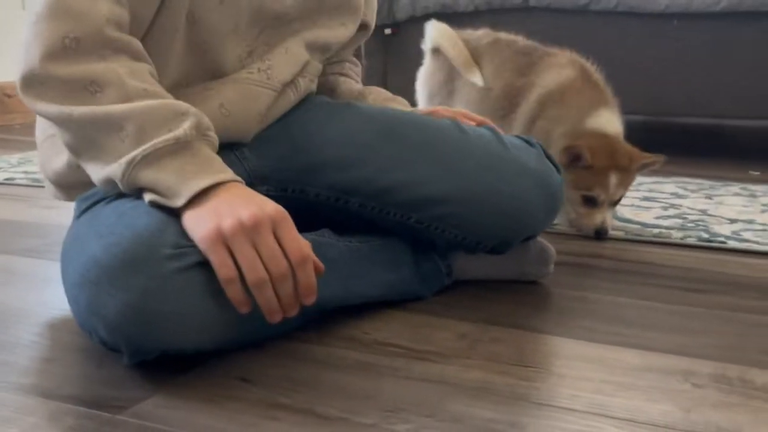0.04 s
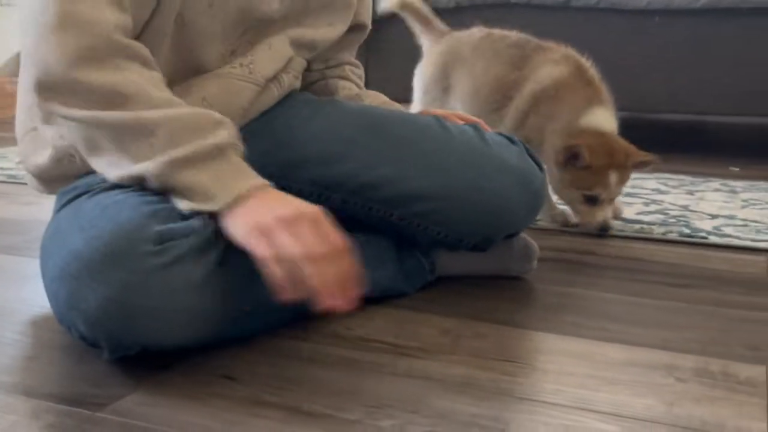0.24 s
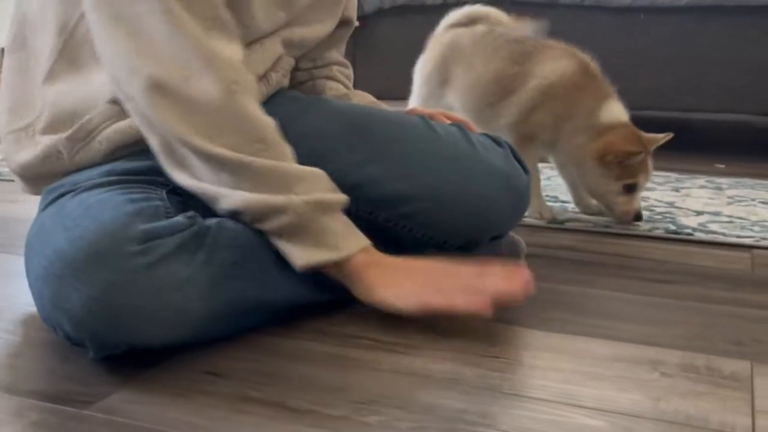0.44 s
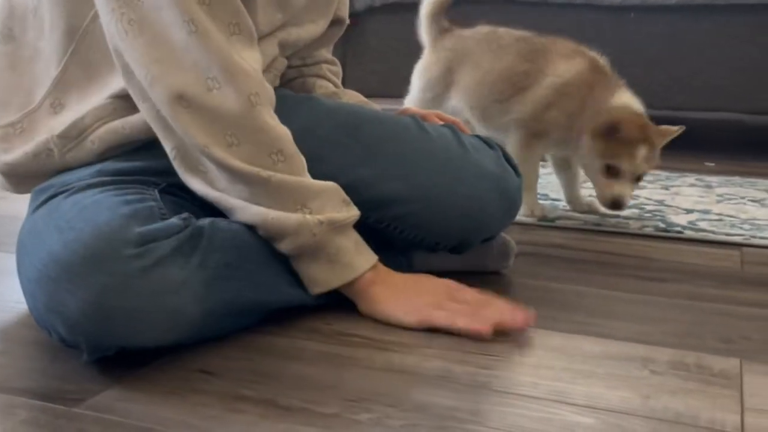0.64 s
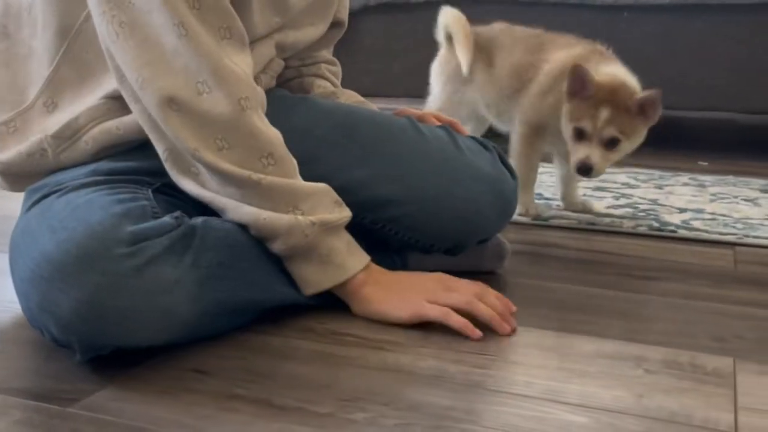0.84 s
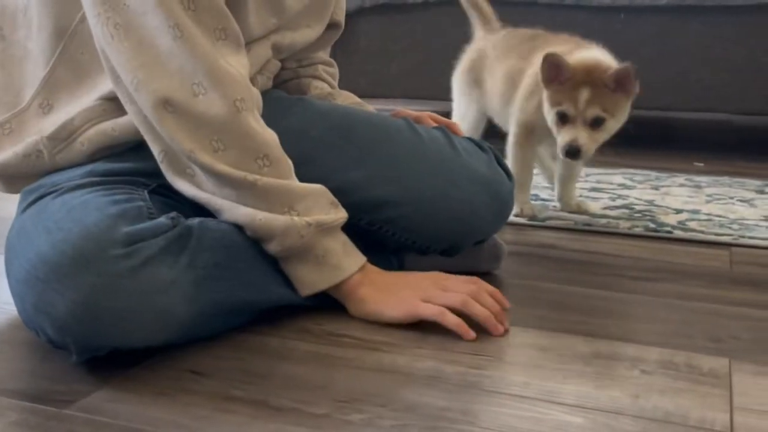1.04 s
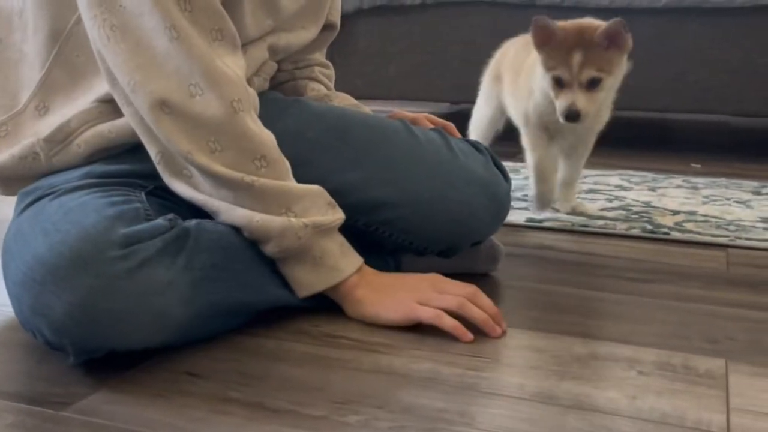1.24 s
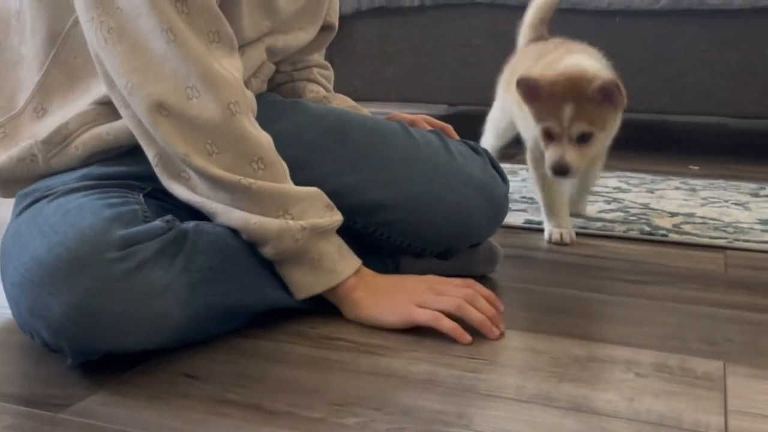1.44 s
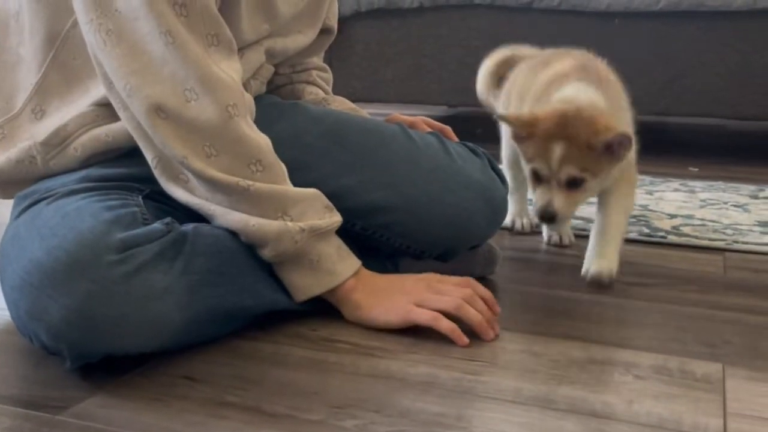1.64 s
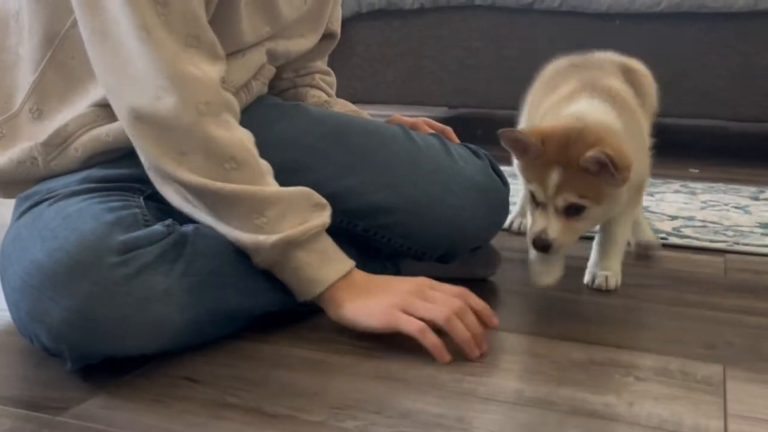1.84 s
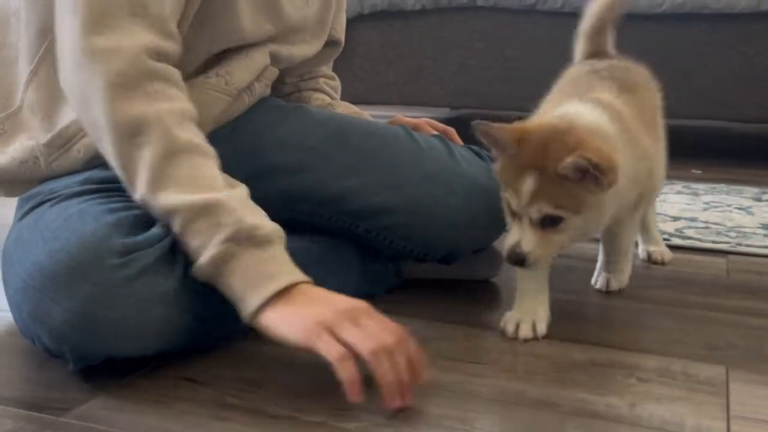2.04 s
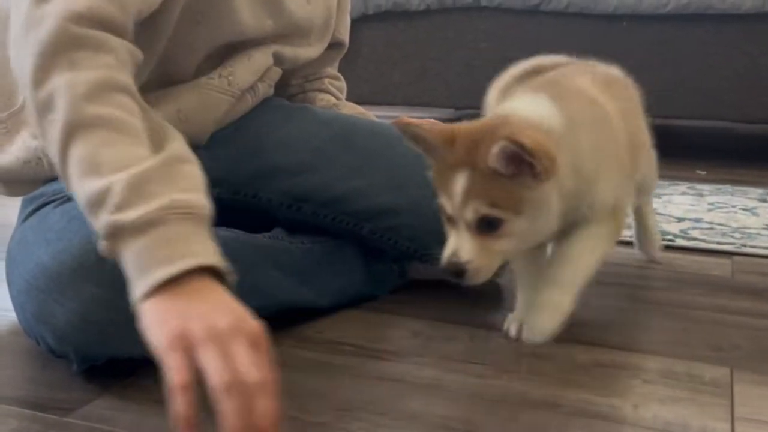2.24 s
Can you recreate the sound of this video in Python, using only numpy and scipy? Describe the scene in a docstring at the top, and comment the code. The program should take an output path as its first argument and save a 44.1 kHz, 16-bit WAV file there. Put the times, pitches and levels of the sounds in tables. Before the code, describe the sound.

A small dog's footsteps cross a hard floor indoors, close to the microphone. First a hand smacks the boards and the fingertips tap down; then padded steps approach with light claw clicks, over faint sleeve rustle and a low appliance hum.

```python
"""Puppy crossing a laminate floor

A small room, a stereo microphone near someone who sits on the floor and pats it with one hand.
A puppy walks off a rug towards them; its claws tick and skid as it comes close.
Every pat and paw sends a bending wave through the hollow floor and sets the boards ringing.
A sleeve rustles as the arm moves, and an appliance hums in the background."""
import sys
import numpy as np
from scipy import signal
from scipy.fft import rfft, irfft, next_fast_len
from scipy.io import wavfile
from scipy.ndimage import map_coordinates

SR = 44100
rng = np.random.default_rng(int(sys.argv[2]) if len(sys.argv) > 2 else 0)


def wav_out(sig):
    """Save sig, one row per channel (or a flat mono array), as 16-bit PCM at SR to the path in sys.argv[1]."""
    wavfile.write(sys.argv[1], SR, np.round(np.clip(np.atleast_2d(sig).T, -1, 1) * 32767).astype(np.int16))


N = 100768
T = np.arange(N) / SR
FFT_SIZE = next_fast_len(N + SR)
HZ = np.fft.rfftfreq(FFT_SIZE, 1 / SR)

# Each row: start in seconds, thud in dB, softness corner in Hz, tick in dB, nail ping in Hz.
PAW_FALLS = [(.052, -58.5, 390, -80, 4000), (.786, -50.5, 167, -82, 4000),
             (0.8664, -38, 101.4, -59.5, 4300), (.9485, -40, 119.6, -58, 3600),
             (1.071, -31.5, 109.2, -58, 4270), (1.1454, -42.5, 120.5, -63, 3510),
             (1.412, -55, 390, -63, 5700), (1.5226, -39, 163, -53.5, 3670), (1.607, -69, 305, -72.5, 4200),
             (1.625, -33.5, 204, -60, 4170), (1.7404, -36.5, 166, -56.5, 4350),
             (1.853, -45.5, 157, -66, 3940), (1.904, -39.5, 110, -75, 4000), (1.95, -37.5, 176, -62, 4000),
             (2.013, -42.5, 238, -56, 4000), (2.028, -38.5, 206, -70.5, 4000),
             (2.119, -39, 148, -50.5, 4000), (2.190, -39, 167, -60, 4050), (2.205, -42.5, 167, -61.5, 4050)]
# Pads dragging. Each row: time in seconds, level in dB.
DRAG_LEVEL = [(1.4, -92), (1.6, -55), (1.68, -57), (1.82, -83), (1.91, -52), (2.07, -53.5), (2.15, -64),
              (2.284, -62.5)]
# Each row: start in seconds, level in dB, decay (t60) in seconds, low cut in Hz.
CLAW_STRIKES = [(1.763, -49.5, .03, 5840), (1.771, -41.5, 0.046, 5200), (1.929, -50, 0.028, 6150),
                (2.0143, -36.5, 0.01, 2500), (2.035, -54, 0.02, 3000), (2.136, -44.5, 0.018, 4400),
                (2.2577, -40, 0.024, 7000), (2.270, -47, 0.034, 7100), (2.275, -51, .035, 7000)]
# Each row: centre in seconds, level in dB, half-length in seconds, pitch in Hz, bandwidth in Hz.
RUBS = [(0.321, -49.5, 0.0082, 497, 50.5), (0.669, -53.5, 0.0057, 500, 120),
        (0.905, -63.5, 0.0016, 1530, 606), (1.424, -47, 0.0059, 248, 88.5),
        (1.949, -62.5, 0.0074, 1400, 1010), (2.014, -51.5, 0.0028, 646, 158),
        (2.042, -56, 0.0037, 630, 150), (2.075, -53, 0.0046, 5600, 160)]
# The hand lands. Each row: time in seconds, thud in dB, softness corner in Hz, skin smack in dB.
PALM_HITS = [(0.5211, -26, 514, -34.5), (0.532, -46, 586, -48.5)]
FINGER_HITS = [(0.697, -63.5, 200, -56.5), (0.702, -29.5, 194.4, -43.5)]
# Each row: pitch in Hz, gain in dB under paws or fingers, gain in dB under the palm, t60 in seconds.
FLOOR_MODES = [(45, -28, -13, 0.44), (68.9, -0.5, -5.5, 0.32), (75, -8, -2, 0.32), (88, -20.5, -12.5, 0.81),
               (161.8, 2.5, -7, 0.2), (195, -6.5, -1.5, 0.22), (220.7, -15.5, -8, 0.42),
               (245.9, -7.5, -1.5, 0.4), (279, -14, -35, 0.35), (334, -18, -10, 0.2), (352.4, -12, -4, 0.2),
               (453, -15, -17, 0.17), (552, -18.5, -9, 0.27), (589, -9, -6, 0.22), (647.6, -9, -17, 0.25),
               (984, -12, -9, 0.2), (1117, -19, -12, 0.1), (1219, -9, -9, 0.16)]
# Cloth and skin sliding. Each row: time in seconds, level in dB.
SLEEVE_LEVEL = [(0, -64.5), (.08, -64), (0.189, -74.5), (.22, -60.5), (.28, -55.5), (.36, -61.5),
                (.49, -63.5), (.54, -56.5), (.6, -68), (.67, -103), (.72, -66.5), (.76, -75), (.81, -98),
                (1.4, -87.5), (1.68, -80.5), (1.79, -66.5), (1.87, -70.5), (1.94, -62), (1.99, -62),
                (2.06, -57), (2.13, -59), (2.2, -59), (2.25, -64.5), (2.284, -55.5)]
# Each row: frequency in Hz, level in dB.
HUM_PARTIALS = [(59.6, -58.5), (119, -60.5)]

# The tone colour of each sound. Each row: frequency in Hz, relative gain in dB.
TICK_COLOUR = [(300, -3), (620, 15), (900, 1), (1400, -1), (2800, -4), (4000, -5), (5200, -10.5),
               (6200, -2), (8500, -1.5), (12000, -4.5)]
DRAG_COLOUR = [(80, -9), (200, 3.5), (290, 6), (400, -19), (640, -16.5), (1000, -26.5), (2000, -36),
               (5000, -60)]
CLAW_COLOUR = [(800, 0), (3000, -2.5), (5000, -8.5), (6200, 5), (7300, -1), (8400, 8), (9800, -2),
               (11300, -1.5), (13000, -1)]
SKID_COLOUR = [(500, -25), (1020, 9.5), (1500, -15), (2400, -2), (2900, -11), (3400, 7), (4000, -8),
               (6500, 2.5), (8600, 3), (12000, -6.5)]
SMACK_COLOUR = [(200, -29), (900, 14), (1400, 5.5), (2200, -2), (4500, -5.5), (8000, -2.5), (12000, -4)]
RATTLE_COLOUR = [(120, -13), (250, 5.5), (400, -3.5), (520, 1), (700, 0), (850, -11.5), (1020, -7),
                 (1300, -17), (1700, -19.5), (2200, -31), (5000, -53)]
FINGERTIP_COLOUR = [(300, -1), (800, 5), (1400, 5.5), (2300, 1.5), (3200, -4.5), (5000, -8), (8500, -2),
                    (12000, -7)]
BENDING_WAVE_COLOUR = [(30, -26.5), (70, -12), (160, 12), (300, -7), (600, -30.5), (1000, -6), (2000, -20)]
CLOTH_COLOUR = [(150, 10.5), (400, 2.5), (1300, 4), (2200, 1.5), (4500, -1), (6500, -1), (8800, 1),
                (11300, 2.5), (13000, -28.5)]
REVERB_COLOUR = [(60, -21), (170, -15.5), (400, -9.5), (1000, -10), (3000, -9.5), (9000, -8.5)]
ROOM_TONE_COLOUR = [(20, -8), (45, 3), (70, -7.5), (125, 1), (200, -24), (400, -32), (1000, -43),
                    (3000, -49), (9000, -52.5), (13000, -52.5)]

# The room's decay. Each row: frequency in Hz, t60 in seconds.
ROOM_T60 = [(80, 0.16), (300, 0.34), (1000, 0.41), (4000, 0.41), (11000, 0.24)]
# Width of diffuse sound. Each row: frequency in Hz, side over mid in dB.
STEREO_WIDTH = [(60, -19.5), (150, -8.5), (280, -4), (500, -2), (1500, 3), (3500, -6.5), (6500, -9),
                (9000, -17), (12000, -18.5)]
# Balance at the microphone. Each row: frequency in Hz, left over right in dB.
LEFT_GAIN = [(60, 0.2), (160, 3.5), (300, 1), (1200, 2), (5000, 3.5), (9000, 0.3)]
# Phase between its two ports. Each row: frequency in Hz, the left's lead in radians.
LEFT_LEAD = [(0, -1.5), (1000, 0.59), (1900, 1.13), (2500, 0.58), (3200, 1.2), (4500, 0.65), (5700, 0.9),
             (6800, 0.94), (7700, 1), (8600, 1), (10000, -2.5), (11000, -5), (11800, -4.5)]


def paws():
    """Each paw ticks as it touches, then its weight thumps the floor; the pads drag between steps."""
    ticks = 0
    for start, _, _, db, ping_hz in PAW_FALLS:
        ping = 1 + amp(9.5) * resonance(ping_hz, width_hz=220)
        ticks += amp(db) * burst(start, rise_s=0.001, t60=0.022) * noise(colour(TICK_COLOUR) * ping)
    drag = swell(DRAG_LEVEL) * noise(colour(DRAG_COLOUR))
    return floor_thuds(PAW_FALLS) + ticks + drag


def claws():
    """Claws strike the boards in bright clicks and short scratches; one paw skids."""
    clicks = 0
    for start, db, t60, edge_hz in CLAW_STRIKES:
        scratch = noise(colour(CLAW_COLOUR) * low_cut(edge_hz))
        clicks += amp(db) * burst(start, rise_s=0.0003, t60=t60) * scratch
    skid = amp(-42) * bump(centre_s=2.064, half_s=0.0042) * noise(colour(SKID_COLOUR))
    return clicks + skid


def palm():
    """Skin smacks the boards, air pops from under the palm, the floor booms and loose boards chatter."""
    start, rise_s = PALM_HITS[0][0], 0.0022
    pop = amp(-32.5) * burst(start, rise_s, t60=0.03) * noise(resonance(996, width_hz=140))
    rattle = amp(-38) * burst(start, rise_s=0.0099, t60=0.33) * noise(colour(RATTLE_COLOUR))
    hits = sum(amp(db) * burst(s - rise_s, rise_s, t60=0.036) for s, _, _, db in PALM_HITS)
    smacks = hits * noise(colour(SMACK_COLOUR))
    return floor_thuds(PALM_HITS, under_palm=True) + smacks + pop + rattle


def fingers():
    """The fingertips tap down a moment after the palm."""
    taps = sum(amp(db) * burst(s - 0.001, rise_s=0.0012, t60=0.022) for s, _, _, db in FINGER_HITS)
    return floor_thuds(FINGER_HITS) + taps * noise(colour(FINGERTIP_COLOUR))


def floor_thuds(blows, under_palm=False):
    """Soft blows on the hollow floor: a bending wave, treble first, and the ringing boards."""
    ring = 0
    for hz, paw_db, palm_db, t60 in FLOOR_MODES:
        ring += amp(palm_db if under_palm else paw_db) * np.cos(2 * np.pi * hz * T) * fade(T, t60)
    wave = amp(-62 if under_palm else -54) * colour(BENDING_WAVE_COLOUR)
    response = rfft(ring, FFT_SIZE) / SR + wave
    lag_cycles, knee_hz = 1.551, 29.83  # the delay grows towards the bass, levelling off below the knee
    dispersion = np.exp(-2j * np.pi * lag_cycles * np.log1p(HZ / knee_hz))
    force = sum(amp(db) * delay(s) * high_cut(corner_hz, order=2.44) for s, db, corner_hz, *_ in blows)
    return SR * irfft(force * response * dispersion, FFT_SIZE)[:N]


def squeaks():
    """Brief rubs, knocks and squeaks on the boards, each in one resonance."""
    return sum(amp(db) * bump(s, half_s) * noise(resonance(hz, width_hz))
               for s, db, half_s, hz, width_hz in RUBS)


def sleeve():
    """Grainy friction of cloth that follows the moving arm."""
    grain_db, grains_per_s = 2, 350
    grain = map_coordinates(rng.standard_normal(N), [T * grains_per_s])
    friction = unit(amp(grain_db * grain) * noise(colour(CLOTH_COLOUR)))
    return swell(SLEEVE_LEVEL) * friction


def reverb(x):
    """The small room's diffuse answer, shorter in the bass and the high treble."""
    hz, t, bands = signal.stft(rng.standard_normal((2, SR // 2)), SR, nperseg=256)
    t60 = curve(ROOM_T60, hz)[:, None]
    equal_energy = np.sqrt(2 * np.log(1000) / (t60 * SR))
    tail = signal.istft(bands * fade(t, t60) * equal_energy, SR, nperseg=256)[1]
    return diffuse(filtered(x, rfft(tail, FFT_SIZE) * colour(REVERB_COLOUR) * delay(0.005)))


def background():
    """An appliance's hum over low room tone."""
    hum = sum(amp(db) * np.sqrt(2) * np.sin(2 * np.pi * (hz * T + rng.random()))
              for hz, db in HUM_PARTIALS)
    room_tone = diffuse([noise(colour(ROOM_TONE_COLOUR)) for _ in range(2)])
    return hum + amp(-58.5) * room_tone


def diffuse(pair):
    """Two unrelated signals as mid and side at the microphone."""
    mid, side = pair[0], filtered(pair[1], colour(STEREO_WIDTH))
    return np.array([mid + side, mid - side])


def amp(db):
    """Decibels to gain."""
    return 10 ** (np.asarray(db) / 20)


def unit(x):
    """Scale to rms 1."""
    return x / np.sqrt(np.mean(x ** 2) + 1e-20)


def curve(points, hz=HZ):
    """Join (Hz, value) points on a log frequency axis."""
    freqs, values = np.transpose(points)
    return np.interp(np.log(hz + 1), np.log(freqs + 1), values)


def colour(points):
    """Frequency response through (Hz, dB) points."""
    return amp(curve(points))


def resonance(hz, width_hz):
    """Gain of one resonant peak."""
    return 1 / (1 + (2 * (HZ - hz) / width_hz) ** 2)


def low_cut(hz):
    """Fifth-order bass roll-off."""
    return 1 / np.sqrt(1 + (hz / (HZ + 1)) ** 10)


def high_cut(hz, order):
    """Treble roll-off."""
    return 1 / np.sqrt(1 + (HZ / hz) ** (2 * order))


def delay(seconds):
    """Frequency response of a delay."""
    return np.exp(-2j * np.pi * HZ * seconds)


def filtered(x, response):
    """Pass x through a frequency response."""
    return irfft(rfft(x, FFT_SIZE) * response, FFT_SIZE)[..., :N]


def noise(response):
    """Coloured noise of rms 1."""
    return unit(filtered(rng.standard_normal(N), response))


def fade(t, t60):
    """Decay by 60 dB in t60 seconds."""
    return np.exp(-np.log(1000) * np.maximum(t, 0) / t60)


def burst(start, rise_s, t60):
    """Envelope of a contact: a quick rise, then a decay."""
    since_peak = T - start - rise_s
    return np.exp(-(np.minimum(since_peak, 0) / rise_s) ** 2) * fade(since_peak, t60)


def bump(centre_s, half_s):
    """Bell-shaped envelope of a rub."""
    return np.exp(-0.5 * ((T - centre_s) / half_s) ** 2)


def swell(points):
    """Envelope through (seconds, dB) points."""
    return amp(np.interp(T, *np.transpose(points)))


def scene():
    """Puppy, hand and sleeve with the room's answer behind them, over the hum."""
    pat = palm()
    light_sounds = paws() + fingers() + claws() + squeaks() + sleeve()
    return pat + light_sounds + reverb(pat) + reverb(amp(0.5) * light_sounds) + background()


def record(dry):
    """A two-port microphone, the left a little nearer, with a bass cut, a treble notch and a steep top."""
    left_over_right = colour(LEFT_GAIN) * np.exp(1j * curve(LEFT_LEAD))
    ports = left_over_right ** np.array([[0.5], [-0.5]])  # half to each side
    notch = 1 - resonance(10420, width_hz=100)
    return filtered(dry, ports * notch * low_cut(36) * high_cut(12200, order=45))


dry = scene()
out = record(dry)
wav_out(out)
```